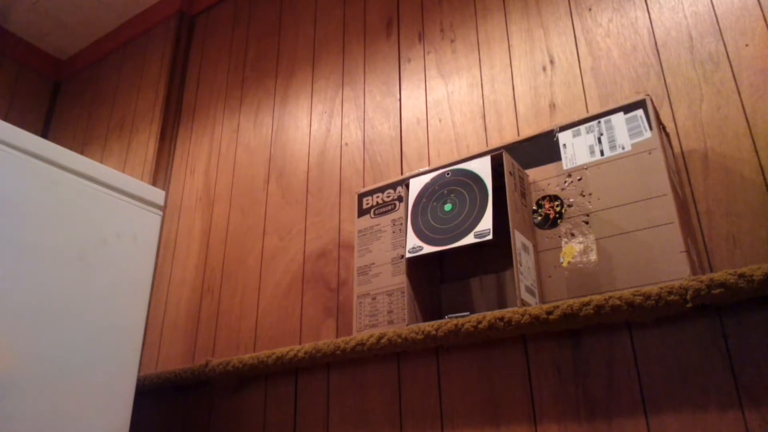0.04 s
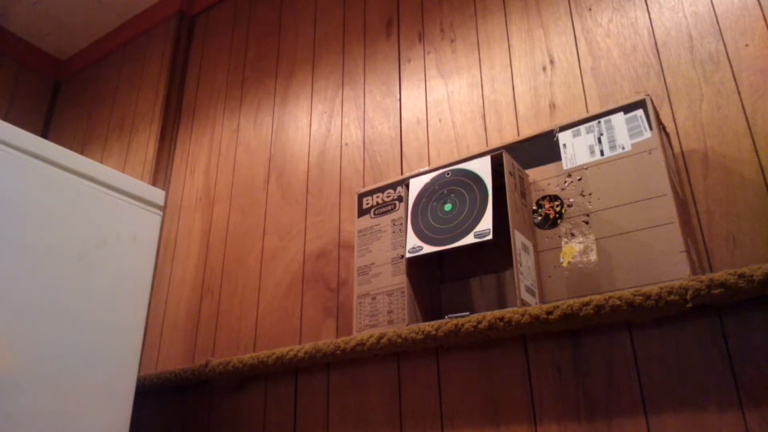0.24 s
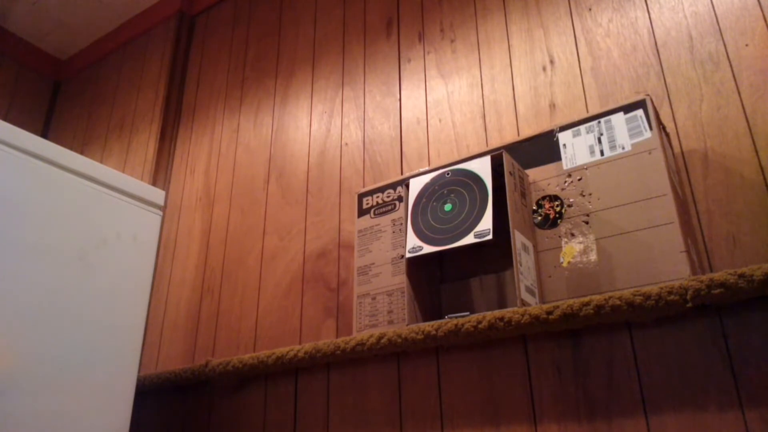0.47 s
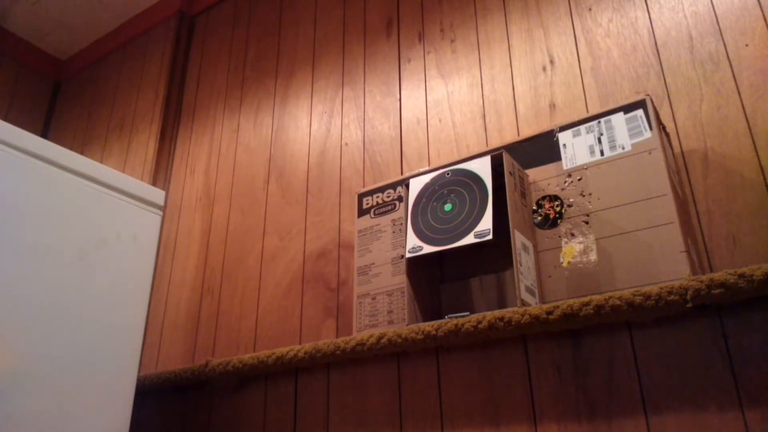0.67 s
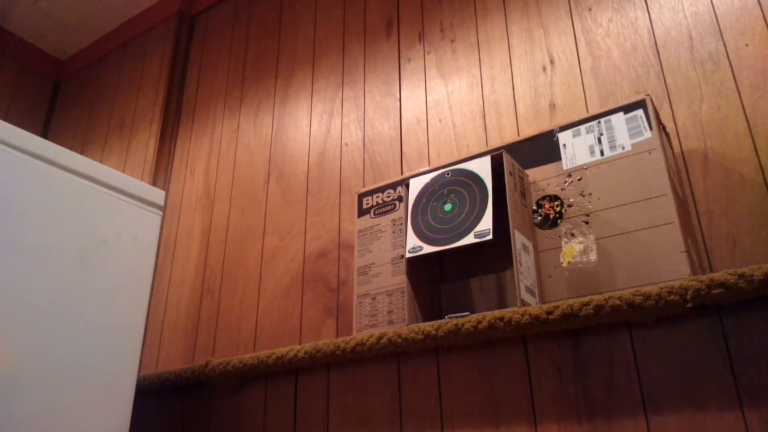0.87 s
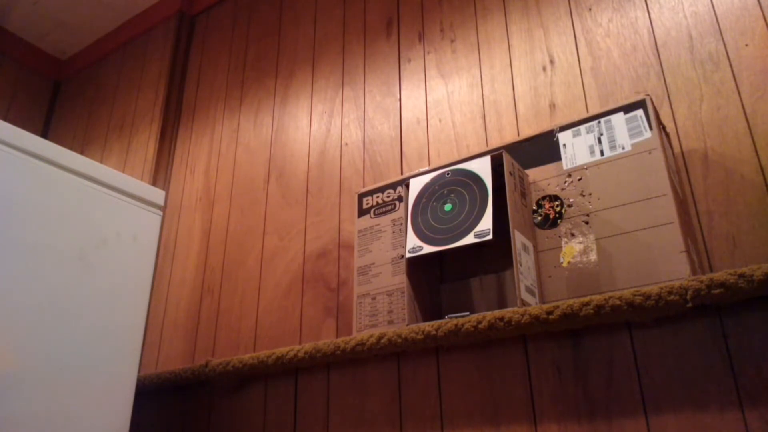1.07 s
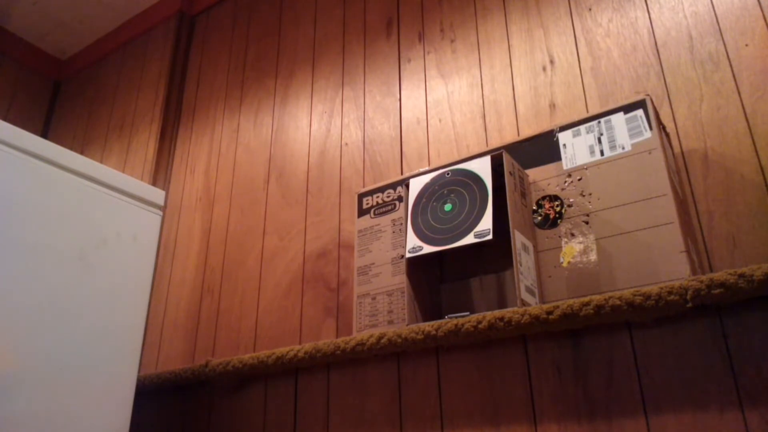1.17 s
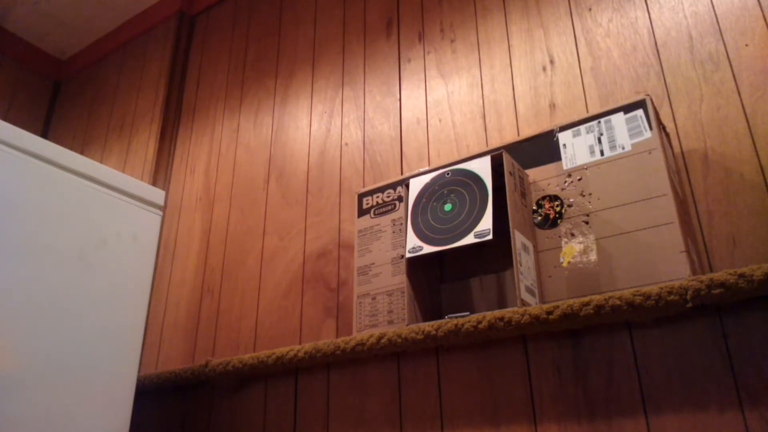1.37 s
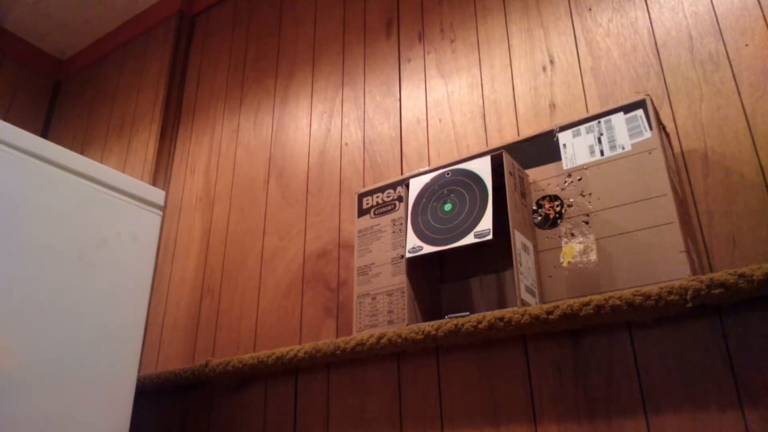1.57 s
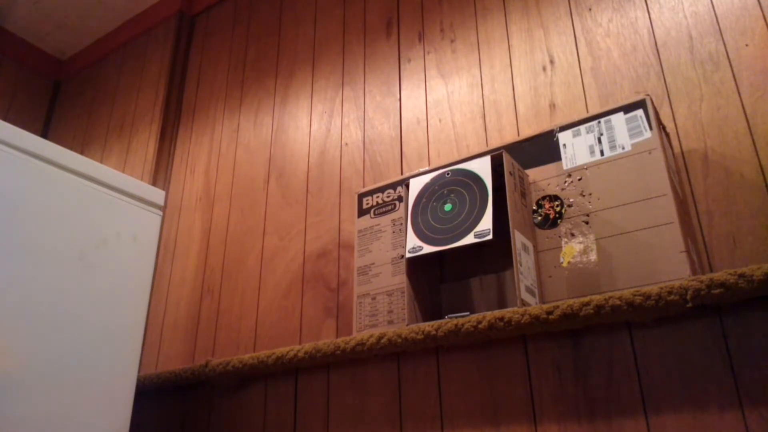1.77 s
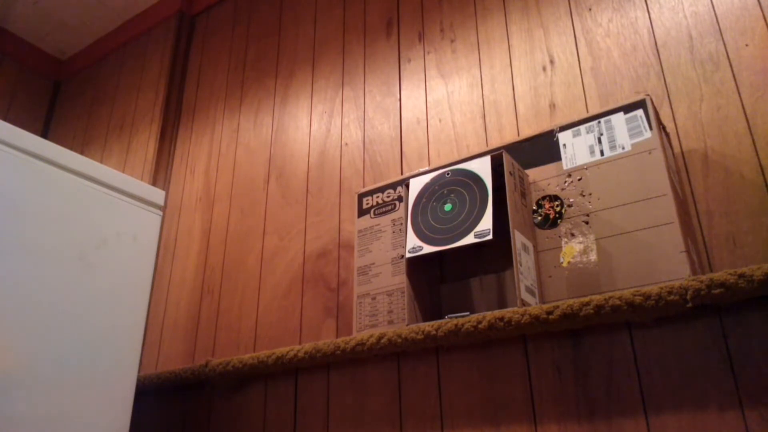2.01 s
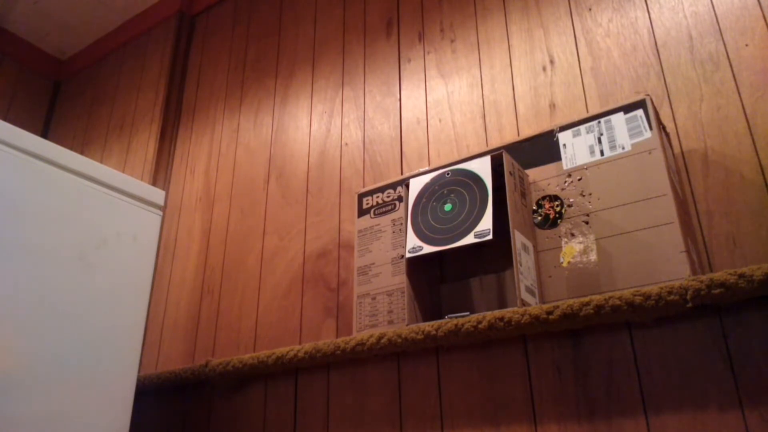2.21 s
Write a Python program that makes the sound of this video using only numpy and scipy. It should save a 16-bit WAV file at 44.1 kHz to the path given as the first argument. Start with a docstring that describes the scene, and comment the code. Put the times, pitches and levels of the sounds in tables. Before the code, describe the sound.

A spring air pistol cracks once, close and bright, in a small wood-panelled room; the pellet ticks and pings faintly, hands rub the grip, then the slide racks with a hard clatter over low appliance hum.

```python
"""A spring air pistol is fired once in a small wood-panelled room: rushing noise, crack, puff, spring buzz.
The pellet pings (beating sine pairs) and ticks (filtered noise bursts) as it bounces.
The hand rubs over the grip (sparse grains), then racks the slide back against the spring until it
latches (grains, bursts, frame modes) and eases it forward again. A noise room response rings after every
snap; an appliance hums throughout (wavering sines, resonant noise) over low rumble and faint hiss."""
import sys
import numpy as np
from scipy import signal
from scipy.fft import rfft, irfft
from scipy.io import wavfile

SR = 44100
rng = np.random.default_rng(int(sys.argv[2]) if len(sys.argv) > 2 else 0)


def waveform_to_disk(signal):
    """Save audio, clipped to [-1, 1], as 16-bit WAV at the path in sys.argv[1]."""
    frames = np.transpose(np.atleast_2d(signal))
    scaled = np.clip(frames, -1, 1) * 32767
    samples = np.round(scaled).astype(np.int16)
    wavfile.write(sys.argv[1], SR, samples)


N = 99225
T = np.arange(N) / SR
CUTOFF_HZ = 14300
ROOM_SAMPLES = 32768
FILTER_SAMPLES = BURST_SAMPLES = 8192
CONTACT_RISE_S = 0.0005

# Blow levels are energies: the rms dB the blow would have if spread over one millisecond.
# Room dB is the energy of the room sound over the direct sound.
# Spectrum dB is relative: colour() rescales it to keep the power.


def from_db(db):
    """Decibels to amplitude gain."""
    return 10 ** (np.asarray(db) / 20)


def at_hz(points, hz):
    """Interpolate a table on a log-frequency axis."""
    point_hz, value = np.transpose(points)
    return np.interp(np.log(hz), np.log(point_hz), value)


def colour(x, points, tilt_db=0, keep_power=True):
    """Minimum-phase filter with the given spectrum, plus a tilt per octave above 1 kHz."""
    half = FILTER_SAMPLES // 2
    hz = np.maximum(np.arange(half + 1) * SR / FILTER_SAMPLES, 1)
    tilt = tilt_db * np.log2(np.clip(hz, 1000, CUTOFF_HZ))
    gain = from_db(at_hz(points, hz) + tilt)
    if keep_power:
        gain = gain / np.sqrt(np.mean(gain ** 2 * (hz < CUTOFF_HZ)))
    # folding the cepstrum makes the response causal
    cepstrum = irfft(np.log(gain))
    cepstrum[1:half] *= 2
    cepstrum[half + 1:] = 0
    response = irfft(np.exp(rfft(cepstrum)))
    return signal.oaconvolve(x, response)[:len(x)]


def at_level(x, db):
    """Scale a blow to the energy of one millisecond at this rms level."""
    return from_db(db) * x * np.sqrt(SR / 1000 / (np.sum(x ** 2) + 1e-20))


def decay(start_s, t60_s):
    """Sudden start, exponential fall of 60 dB per t60."""
    return (T >= start_s) * from_db(-60 * np.clip((T - start_s) / t60_s, 0, 4))


def burst(start_s, db, t60_s):
    """Rattle of contact: noise of even spectrum that swells quickly and dies."""
    shape = decay(0, t60_s)[:BURST_SAMPLES] * (1 - np.exp(-T[:BURST_SAMPLES] / CONTACT_RISE_S))
    x = rng.standard_normal(BURST_SAMPLES) * shape
    for _ in range(2):  # flatten the spectrum, keep the phases, reshape mildly
        x = irfft(np.exp(1j * np.angle(rfft(x)))) * shape ** .2
    return at_level(np.pad(x, (int(start_s * SR), N))[:N], db)


def ring(start_s, hz, t60_s):
    """One struck mode: a decaying sine."""
    return decay(start_s, t60_s) * np.sin(2 * np.pi * hz * (T - start_s))


SHOT_S = .1605  # the piston hits the end of its cylinder
RUSH_S, RUSH_DB, RUSH_RISE_DB = 0.0061, -6, 12.5
CRACK_DB, CRACK_T60_S, CRACK_ROOM_DB = -4.5, 0.15, -2.5
PUFF_DB, PUFF_T60_S, PUFF_ROOM_DB = -7.5, 0.033, 3
BUZZ_DB, BUZZ_T60_S, BUZZ_ROOM_DB = -7, 0.14, 6
SPRING_ROOM_DB = -17.5
# Spectrum of the piston's crack. Each row: frequency in Hz, level in dB.
CRACK_SPECTRUM = [(500, -19), (2500, -4), (3700, -14.5), (4900, 3), (7000, 5.5), (9000, 5.5), (11500, 2.5),
                  (13000, 3), (14200, -7)]
# Spectrum of the air leaving the muzzle. Each row: frequency in Hz, level in dB.
PUFF_SPECTRUM = [(45, -3), (75, 8), (110, -18.5), (160, 5.5), (200, -1.5), (290, 4), (480, 1), (800, 1.5),
                 (950, -5), (1650, -6), (1900, -13), (3000, -22.5)]
# Spectrum of the spring shaking in its housing. Each row: frequency in Hz, level in dB.
BUZZ_SPECTRUM = [(1000, -42), (2400, -14), (3300, -18), (4400, -9.5), (5000, -6), (5900, -3.5), (7300, -9),
                 (8400, -20), (11000, -54), (14200, -39)]
# Faint ringing of the spring. Each row: frequency in Hz, initial amplitude in dB, T60 in seconds.
SPRING_MODES = [(2326, -32, 0.47), (4900, -18, 0.29), (6242, -53, 0.25)]


def shot():
    """The piston rushes forward and cracks home, air puffs out, the spring buzzes and rings."""
    run = (T - SHOT_S) / RUSH_S  # -1 at the start of the run, 0 at impact
    swell = (run > -1) * (run < 0) * from_db(RUSH_RISE_DB * np.clip(run, -1, 0))
    rush = at_level(rng.standard_normal(N) * swell, RUSH_DB)
    crack = colour(rush + burst(SHOT_S, CRACK_DB, CRACK_T60_S), CRACK_SPECTRUM)
    puff = at_level(colour(burst(SHOT_S, PUFF_DB, PUFF_T60_S), PUFF_SPECTRUM), PUFF_DB)
    buzz = colour(burst(SHOT_S, BUZZ_DB, BUZZ_T60_S), BUZZ_SPECTRUM)
    spring = sum(from_db(db) * ring(SHOT_S, hz, t60_s) for hz, db, t60_s in SPRING_MODES)
    blows = in_room(crack, CRACK_ROOM_DB) + in_room(puff, PUFF_ROOM_DB)
    return blows + in_room(buzz, BUZZ_ROOM_DB) + in_room(spring, SPRING_ROOM_DB)


PING_HZ, PING_SPLIT_HZ, PING_TWIN_DB = 13065, 21, 0
PING_RISE_S, PING_T60_S, PING_ROOM_DB = 0.005, 0.21, -9
# The pellet strikes thin metal. Each row: start in seconds, mode amplitude in dB before rise and decay.
PINGS = [(.237, -33.5), (.402, -62)]


def pings():
    """Two close modes beat in a thin, high ring at each strike of the pellet."""
    out = 0
    for start_s, db in PINGS:
        upper = ring(start_s, PING_HZ, PING_T60_S)
        lower = from_db(PING_TWIN_DB) * ring(start_s, PING_HZ - PING_SPLIT_HZ, PING_T60_S)
        rise = np.clip((T - start_s) / PING_RISE_S, 0, 1)
        out = out + in_room(from_db(db) * (upper + lower) * rise, PING_ROOM_DB)
    return out


CLICK_ROOM_TILT_DB = -0.5  # per octave
# Snaps of the pistol's catches and of the pellet. Each row: start in seconds, level in dB, T60 in seconds,
# tilt in dB per octave, room in dB before the room tilt.
CLICKS = [(0.1394, -32, 0.025, 6, 12.5), (0.401, -35.5, 0.0046, 7, 9.5), (0.4136, -30.5, 0.016, 1.5, 8),
          (0.653, -43, 0.027, 2, 7.5), (0.9056, -45, 0.0091, -5, 2), (1.150, -45, 0.0092, 7.5, -1),
          (1.163, -45.5, 0.018, 1, 18), (1.202, -14.5, 0.028, 8.5, 8.5), (1.2196, -13.5, 0.041, -0.5, 10),
          (1.244, -15.5, 0.02, -3, 12.5), (1.396, -27, 0.023, -1, 10), (1.7112, -44.5, 0.0085, 5, 5),
          (1.761, -38.5, 0.018, 9.5, 15), (1.773, -40, 0.013, 19, -13), (1.991, -36, 0.018, 24, 4)]
# Spectrum of a snap. Each row: frequency in Hz, level in dB.
CLICK_SPECTRUM = [(600, -16.5), (2000, -10.5), (2800, -2.5), (3800, 3), (4500, 1.5), (5500, 8), (6400, 4),
                  (7200, 3.5), (8300, -3.5), (10500, -8), (14200, -10.5)]


def clicks():
    """Hard little parts snap together: coloured bursts."""
    out = 0
    for start_s, db, t60_s, tilt_db, room_db in CLICKS:
        snap = at_level(colour(burst(start_s, db, t60_s), CLICK_SPECTRUM, tilt_db), db)
        out = out + in_room(snap, room_db, CLICK_ROOM_TILT_DB)
    return out


LATCH_T60_S, LATCH_ROOM_DB = 0.0048, 0
# The latch catches the piston. Each row: start in seconds, level in dB.
LATCH_SNAPS = [(1.238, -10), (1.2434, -8.5), (1.2449, -5)]
# Spectrum of the latch. Each row: frequency in Hz, level in dB.
LATCH_SPECTRUM = [(1000, -21.5), (2200, -11), (2800, -7.5), (3800, -5.5), (5200, -7.5), (6300, 6),
                  (7200, 6.5), (7800, -2.5), (8600, -2.5), (9600, -5.5), (14200, -18.5)]


def latch():
    """Steel catches snap in: very short coloured bursts."""
    out = 0
    for start_s, db in LATCH_SNAPS:
        snap = at_level(colour(burst(start_s, db, LATCH_T60_S), LATCH_SPECTRUM), db)
        out = out + in_room(snap, LATCH_ROOM_DB)
    return out


KNOCK_WIDTH_OCT = 0.64
# Hollow knocks of the plastic frame. Each row: start in seconds, level in dB, favoured pitch in Hz, room in dB.
KNOCKS = [(1.150, -41.5, 1590, -5), (1.163, -38.5, 1460, 2), (1.194, -29, 1640, 1),
          (1.1990, -19, 1034, 2.5), (1.219, -17, 1710, -10), (1.244, -29.5, 533, 2),
          (1.3963, -29.5, 1600, -4)]
# Modes of the frame. Each row: frequency in Hz, relative amplitude in dB, T60 in seconds.
FRAME_MODES = [(189, -21, 0.035), (380, -13, 0.073), (592, -7, 0.033), (961, -0.5, 0.038),
               (1174, -6, 0.034), (1366, -4, 0.038), (1652, 1.5, 0.044), (2040, -0.5, .018)]


def knocks():
    """Each knock excites the frame's modes, most strongly near one pitch."""
    out = 0
    for start_s, db, centre_hz, room_db in KNOCKS:
        modes = 0
        for k, (hz, mode_db, t60_s) in enumerate(FRAME_MODES):
            favour = 1 / (1 + (np.log2(hz / centre_hz) / KNOCK_WIDTH_OCT) ** 2)
            modes = modes + (-1) ** k * from_db(mode_db) * favour * ring(start_s, hz, t60_s)
        out = out + in_room(at_level(modes, db), room_db)
    return out


STROKE_RELEASE_S, GRAIN_SPREAD_DB = 0.031, 1.6
CATCHES_PER_S, CATCH_DB = 120, 3.5


def friction(strokes, spectrum, grains_per_s, attack_s, room_db):
    """Tiny slips of uneven size come in clumps as a stroke catches and lets go."""
    out = 0
    for start_s, length_s, db, tilt_db in strokes:
        sign = (rng.random(N) < grains_per_s / SR) * rng.choice([-1, 1], N)
        size = from_db(GRAIN_SPREAD_DB * np.minimum(rng.exponential(1, N), 4))
        attack = np.clip((T - start_s) / attack_s, 0, 1)
        release = np.clip((start_s + length_s - T) / STROKE_RELEASE_S + .5, 0, 1)
        catch_db = CATCH_DB * np.interp(T * CATCHES_PER_S, np.arange(N), rng.standard_normal(N))
        slips = sign * size * from_db(catch_db)
        stroke = colour(attack * release * slips / slips.std(), spectrum, tilt_db)
        out = out + in_room(from_db(db) * stroke, room_db)
    return out


SLIDE_GRAINS_PER_S, SLIDE_ROOM_DB, SLIDE_ATTACK_S = 4000, 3, 0.0042
# The slide scrapes along its rails. Each row: start in seconds, length in seconds,
# rms level in dB before the attack and release, tilt in dB per octave.
SLIDE_STROKES = [(1.205, 0.052, -25.5, 0), (1.35, 0.075, -43.5, -4), (1.775, 0.18, -51, -0.5),
                 (1.844, 0.038, -36, 0), (1.868, 0.053, -36.5, -1.5), (1.985, 0.033, -43, -1.5)]
# Spectrum of the scrape. Each row: frequency in Hz, level in dB.
SLIDE_SPECTRUM = [(100, -1.5), (180, -1), (260, -15.5), (500, -10.5), (1100, -18), (1900, -5.5),
                  (2600, -5.5), (4500, -2.5), (6200, 3.5), (8000, 1), (10500, -3), (14200, -6)]


def slide():
    """Dense slips of the slide on its rails."""
    return friction(SLIDE_STROKES, SLIDE_SPECTRUM, SLIDE_GRAINS_PER_S, SLIDE_ATTACK_S, SLIDE_ROOM_DB)


RUB_GRAINS_PER_S, RUB_ROOM_DB, RUB_ATTACK_S = 1700, 1.5, 0.04
# The hand rubs over the grip. Each row: start in seconds, length in seconds,
# rms level in dB before the attack and release, tilt in dB per octave.
RUB_STROKES = [(.42, 0.075, -54, -5), (.575, 0.071, -54, 4), (.748, 0.18, -52.5, 3.5),
               (.83, 0.084, -48, 2.5), (.915, 0.076, -55, 2.5), (1.125, 0.12, -53, 5)]
# Spectrum of the rub. Each row: frequency in Hz, level in dB.
RUB_SPECTRUM = [(800, -4), (1900, -5), (2500, 2), (3400, -8.5), (4200, -2.5), (4950, 2.5), (5800, -0.5),
                (7300, -3.5), (8200, -11), (9600, -9), (10500, -13.5), (14200, -16)]


def grip():
    """Sparser, softly starting slips of skin on the grip."""
    return friction(RUB_STROKES, RUB_SPECTRUM, RUB_GRAINS_PER_S, RUB_ATTACK_S, RUB_ROOM_DB)


ROOM_BUILD_S, ECHOES_PER_S, EARLY_S = 0.0077, 1500, 0.011
# Reverberation of the room. Each row: band centre in Hz, T60 in seconds.
ROOM_T60 = [(150, 0.18), (500, 0.37), (1200, 0.37), (2800, 0.43), (6000, 0.34), (9000, 0.3), (14000, 0.28)]


def room_response():
    """Separate echoes thicken into a wash that dies band by band; mid and side, each of unit energy."""
    t, shape = T[:ROOM_SAMPLES], (2, ROOM_SAMPLES)
    hz = np.maximum(np.arange(ROOM_SAMPLES // 2 + 1) * SR / ROOM_SAMPLES, 1)
    echoes = (rng.random(shape) < ECHOES_PER_S / SR) * np.sqrt(SR / ECHOES_PER_S)
    early = np.exp(-t / EARLY_S)
    wash = rfft(np.sqrt(early * echoes ** 2 + 1 - early) * rng.standard_normal(shape))
    out = 0
    for k, (_, t60_s) in enumerate(ROOM_T60):
        # crossfading bands: 1 at this centre, 0 at the others
        band = at_hz([(centre_hz, j == k) for j, (centre_hz, _) in enumerate(ROOM_T60)], hz)
        out = out + irfft(wash * band) * from_db(-60 * t / t60_s)
    out = out * (1 - np.exp(-t / ROOM_BUILD_S))
    return out / np.sqrt(np.sum(out ** 2, axis=1, keepdims=True))


def in_room(x, room_db, tilt_db=0):
    """Rows: direct, room mid, room side. Each call draws its own echoes: moving parts meet the walls anew."""
    start = np.argmax(np.abs(x) > 1e-6 * np.abs(x).max())
    sent = x[start:start + ROOM_SAMPLES]
    if tilt_db:
        offset_db = -tilt_db * np.log2(6)  # octaves count from 6 Hz, so the tilt also shifts the level
        sent = colour(sent, [(CUTOFF_HZ, offset_db)], tilt_db, keep_power=False)
    wet = from_db(room_db) * signal.fftconvolve(sent[None], room_response(), axes=1)
    return np.vstack([x, np.pad(wet, ((0, 0), (start, N)))[:, :N]])


THROB_HZ, THROB_DB = 120, -48  # rms before the beat
BEAT_S, BEAT_DIP_S, BEAT_DEPTH = 0.4665, 0.34, 0.59  # period, first dip, share
WHIRR_HZ, WHIRR_WIDTH_HZ, WHIRR_DB = 422, 11, -59.5
# Motor and mains lines. Each row: frequency in Hz, rms level in dB before the waver, waver depth from 0 to 1.
HUM_LINES = [(57.6, -49, .3), (80.2, -54.5, 0.92), (164, -65.5, 0.1), (213.3, -65, 0)]


def hum():
    """Motor and mains lines of an appliance waver, one throbs as they beat; its casing resonates in a whirr."""
    knots_s = np.linspace(0, T[-1], num=20)
    beat = 1 - BEAT_DEPTH * np.cos(2 * np.pi * (T - BEAT_DIP_S) / BEAT_S)
    throb = np.sin(2 * np.pi * (THROB_HZ * T + rng.random()))
    out = from_db(THROB_DB) * np.sqrt(2) * beat * throb
    for hz, db, depth in HUM_LINES:
        drift = rng.standard_normal((len(knots_s), 2)) @ [1, 1j]  # amplitude and phase
        waver = 1 + depth * np.interp(T, knots_s, drift)
        line = np.real(waver * np.exp(2j * np.pi * (hz * T + rng.random())))
        out = out + from_db(db) * np.sqrt(2) * line
    resonance = signal.iirpeak(WHIRR_HZ, WHIRR_HZ / WHIRR_WIDTH_HZ, fs=SR)
    whirr = signal.lfilter(*resonance, rng.standard_normal(N + SR))[SR:]  # drop the filter's first second
    return out + from_db(WHIRR_DB) * whirr / whirr.std()


AIR_DB = -46
# Spectrum of the background. Each row: frequency in Hz, level in dB.
AIR_SPECTRUM = [(20, -7.5), (35, 4), (55, 4), (100, 1), (150, 2), (200, -10), (300, -11), (430, -15.5),
                (550, -19), (750, -18.5), (1100, -26.5), (2000, -28), (4000, -32), (7000, -29),
                (11500, -30), (14200, -35)]


def air():
    """Steady low rumble with a faint hiss: coloured noise."""
    return from_db(AIR_DB) * colour(rng.standard_normal(N + SR), AIR_SPECTRUM)[SR:]


AIR_SIDE_DB = -1  # before the width filter
# Stereo width. Each row: frequency in Hz, gain of the side signal in dB.
WIDTH = [(3200, -66), (4600, -30.5), (6200, -12), (8000, -2.5), (14000, -4)]


def scene():
    """Pistol, room and background; only the treble spreads between the ears."""
    pistol = shot() + pings() + clicks() + latch() + knocks() + slide() + grip()
    direct, room_mid, room_side = pistol
    mid = direct + room_mid + hum() + air()
    side = colour(room_side + from_db(AIR_SIDE_DB) * air(), WIDTH, keep_power=False)
    return np.array([mid + side, mid - side])


OVERLOAD = .78  # full scale is 1


def record(dry):
    """Peaks are clipped at the overload level, then a steep low-pass cuts the top."""
    clipped = np.clip(dry, -OVERLOAD, OVERLOAD)
    low_pass = signal.ellip(12, .1, 80, CUTOFF_HZ, fs=SR, output="sos")
    return signal.sosfilt(low_pass, clipped)


dry = scene()
out = record(dry)
waveform_to_disk(out)
```